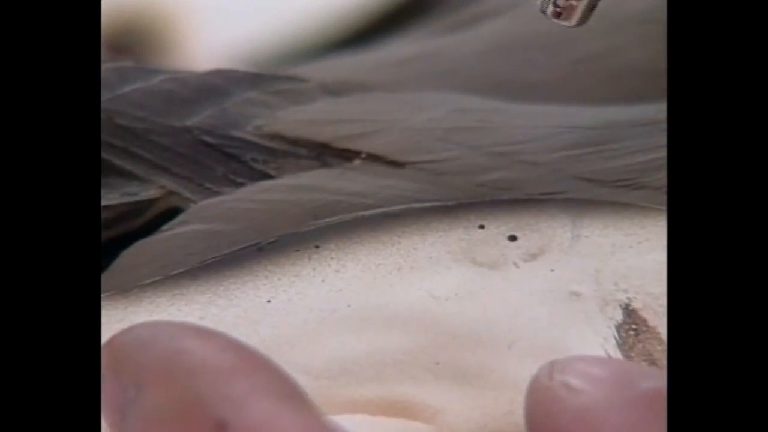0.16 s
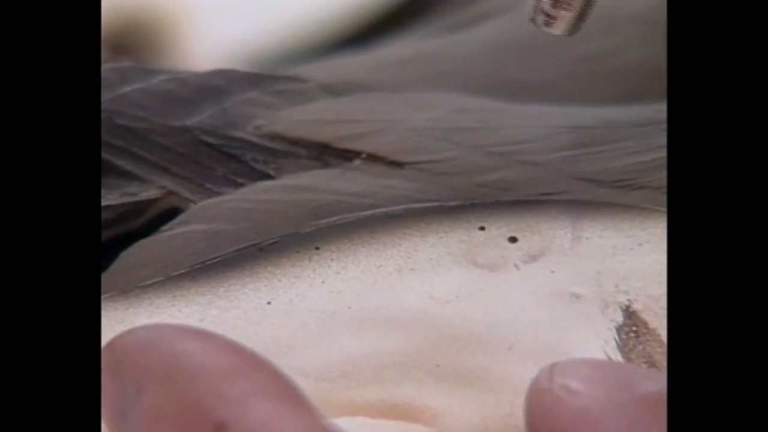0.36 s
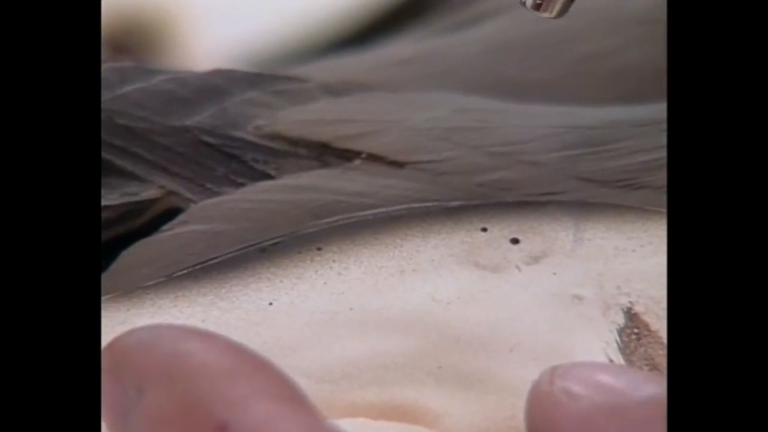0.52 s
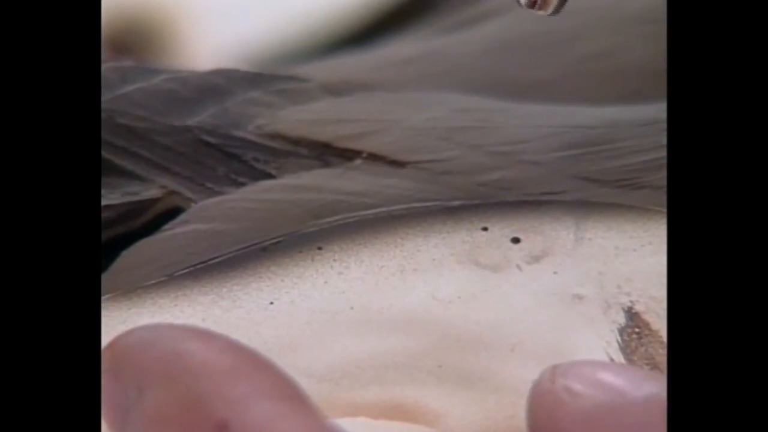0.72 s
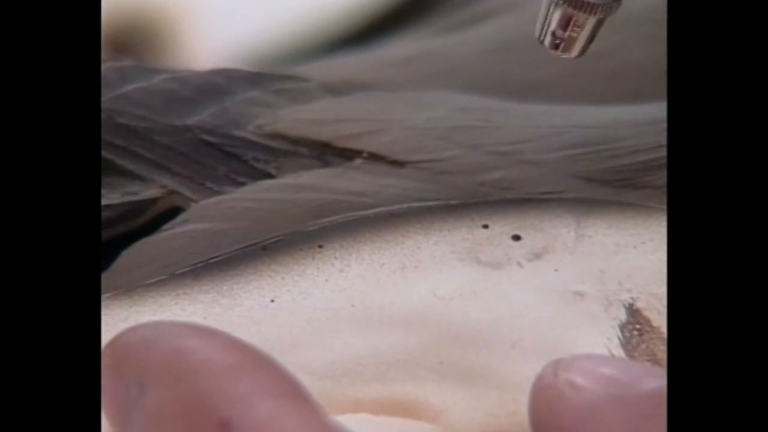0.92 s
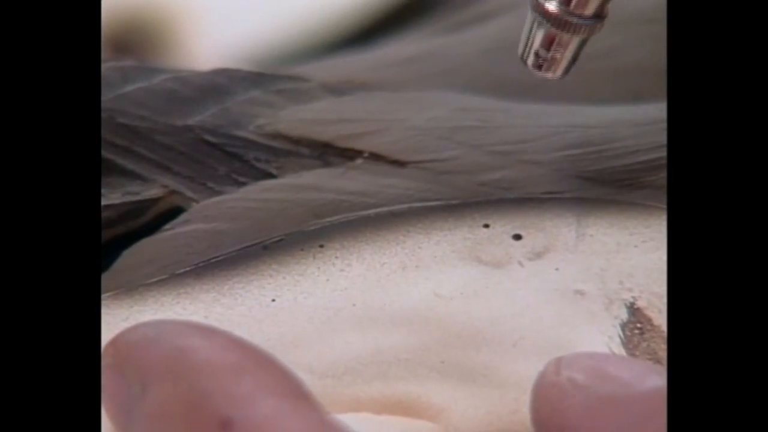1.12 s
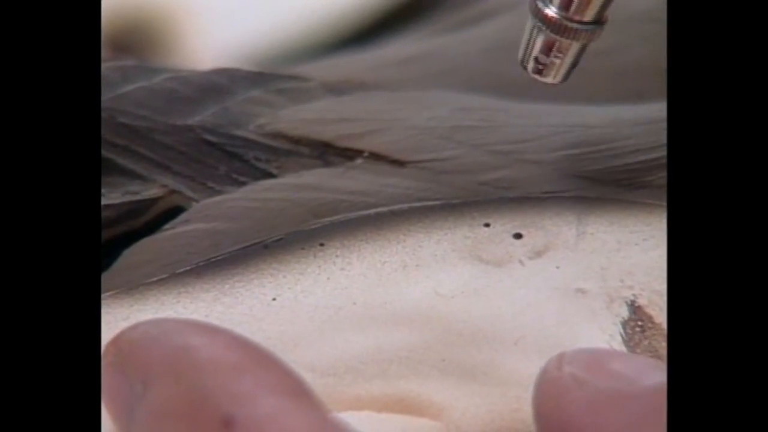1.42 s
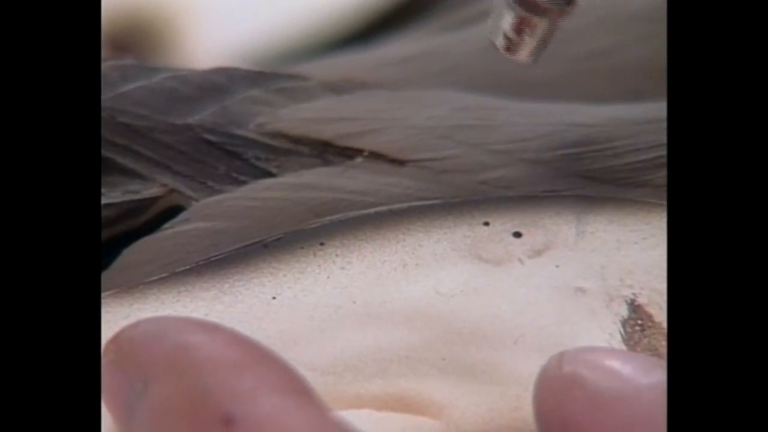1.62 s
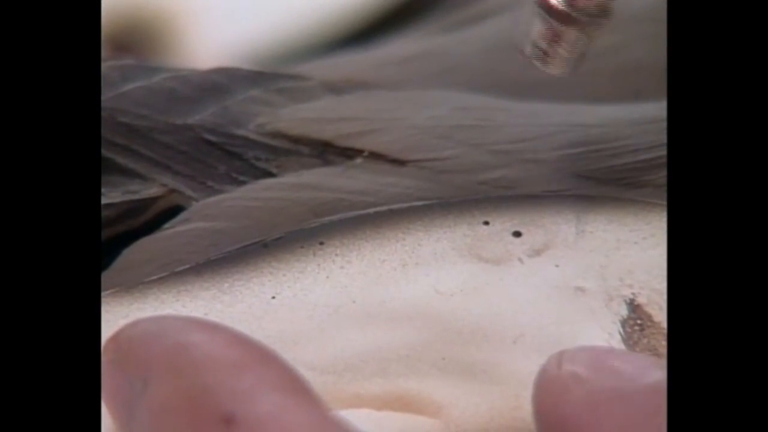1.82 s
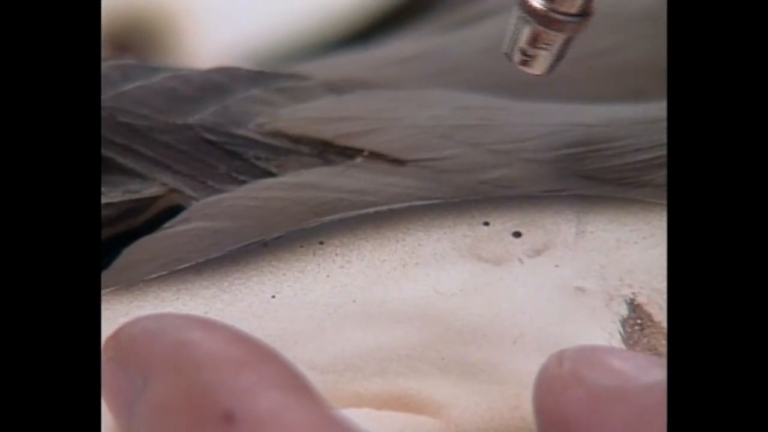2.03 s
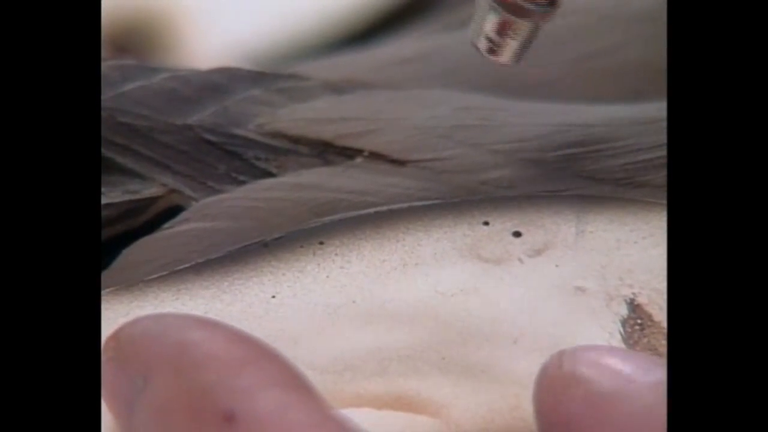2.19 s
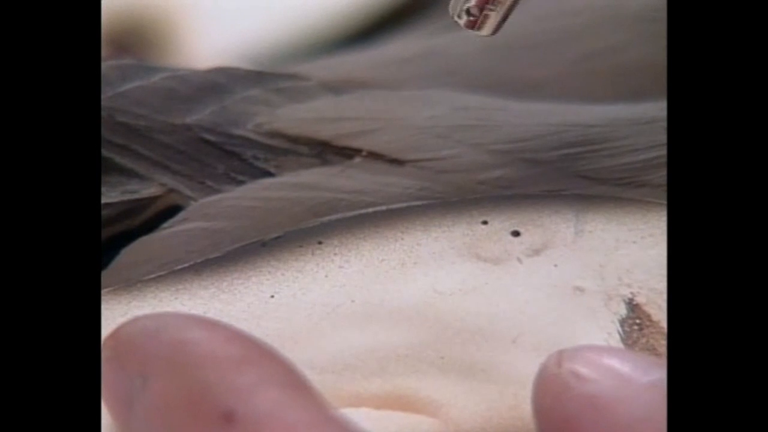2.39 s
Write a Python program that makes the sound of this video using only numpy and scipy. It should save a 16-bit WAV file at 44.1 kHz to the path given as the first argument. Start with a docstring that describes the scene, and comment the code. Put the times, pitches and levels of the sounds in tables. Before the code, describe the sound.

An airbrush sprays three short, bright hissing bursts, the last one easing off.

```python
"""Airbrush in a small workshop

Three close bursts of spray, the last eased off. Each time the trigger goes down, air leaks first;
then the valve opens on a bright nozzle hiss over the lower rush of the jet on the work.
The room rings briefly, and a machine hum and a faint electrical whine sit underneath.
The scene ends on the leak of a fourth press."""
import sys
import numpy as np
from scipy import signal
from scipy.fft import rfft, irfft, next_fast_len
from scipy.io import wavfile
from scipy.ndimage import map_coordinates

SR = 44100
rng = np.random.default_rng(int(sys.argv[2]) if len(sys.argv) > 2 else 0)


def put_to_file(sound):
    """Save the sound as 16-bit audio at rate SR, in the file named by the first command-line argument."""
    columns = np.atleast_2d(sound).T  # one column per channel
    safe = np.clip(columns, -1, 1)
    whole_steps = np.round(safe * 32767)
    wavfile.write(sys.argv[1], SR, whole_steps.astype(np.int16))


N = 112454

# stereo image of the air, wider in the treble (frequency [Hz], coherence [0-1])
AIR_COHERENCE = [(2000, .9998), (3300, .997), (4300, .96), (7000, .78), (15000, .69)]
# stereo image of the room tone, almost mono (frequency [Hz], coherence [0-1])
ROOM_TONE_COHERENCE = [(30, .97), (100, .93), (700, .96), (3000, .99)]
# phase of left against right (frequency [Hz], lead [rad])
LEFT_LEAD = [(5000, 0), (8500, -.3), (13000, -.65), (15500, -.3)]
# lean to the left (frequency [Hz], left minus right [dB])
BALANCE = [(4000, 0), (8100, 1.6), (13000, 2.2)]
# partials of the machine hum (frequency [Hz], level [dB])
HUM_PARTIALS = [(59.2, -66), (102.3, -68.5), (119, -74), (170, -77.5), (188.4, -73.5), (236.9, -73.5),
                (468.3, -84)]
# colour of the room tone (frequency [Hz], gain [dB])
ROOM_TONE_EQ = [(22, -6.5), (45, -1), (62, 1.5), (80, -6.5), (170, -4.5), (300, -20.5), (520, -22.5),
                (800, -32), (1900, -32), (3000, -38.5), (15000, -36.5)]
# trigger presses (valve opens [s], valve shuts [s], leak lead time [s], peak leak level [dB])
PRESSES = [(0.217, 0.623, .036, -45.5), (0.842, 1.215, 0.061, -47.5), (1.663, 2.356, 0.044, -51),
           (2.565, 2.698, 0.052, -44)]
# colour of the leak (frequency [Hz], gain [dB])
LEAK_EQ = [(300, -13), (750, -17.5), (1200, 8.5), (2600, 1), (7000, 3), (11000, 4.5), (15500, 4)]
# nozzle hiss envelopes, one a burst (time [s], level [dB])
HISS_ENVELOPES = [
    [(0.225, -30.5), (0.347, -30), (0.593, -36.5), (0.615, -40.5)],
    [(0.845, -33), (0.847, -36), (1.185, -35.5), (1.21, -40)],
    [(1.67, -35.5), (1.788, -32.5), (1.884, -36), (2.132, -38), (2.144, -41), (2.228, -40.5),
     (2.355, -59.5)],
]
# broad colour of the hiss (frequency [Hz], gain [dB])
HISS_EQ = [(1000, -68), (1400, -35.5), (4800, -19.5), (6700, -14), (8300, -9), (9200, -3), (10500, -2),
           (10950, -8), (12500, -2), (13000, -13), (14200, -4.5), (14700, -16.5), (15700, -11.5)]
# resonances of the hiss (centre [Hz], width [Hz], boost [dB])
HISS_PEAKS = [(5676, 300, 11.5), (7680, 730, 6), (8690, 190, 5.5), (9940, 450, 4.5), (12000, 394, 5)]
# colour of a wide-open nozzle's sizzle (frequency [Hz], gain [dB])
SIZZLE_EQ = [(6000, -64), (7500, 8.5), (8300, -25.5), (11000, -17), (11800, 7.5), (12500, 8.5), (13100, -9),
             (14200, 14), (14700, 0.5), (15700, -11)]
# jet rush envelopes, one a burst (time [s], level [dB])
RUSH_ENVELOPES = [
    [(0.225, -51.5), (0.229, -50), (0.483, -41.5), (0.615, -43)],
    [(0.845, -47.5), (0.869, -42.5), (1.201, -43.5), (1.21, -42)],
    [(1.67, -49), (1.7, -46.5), (1.728, -50), (1.836, -42.5), (2.146, -43.5), (2.355, -55)],
]
# broad colour of the rush (frequency [Hz], gain [dB])
RUSH_EQ = [(600, -64), (930, -20), (1130, 1), (1350, 2), (2100, -0.5), (3100, -6), (5000, -8), (6600, 0),
           (9000, -27), (15000, -14)]
# resonances of the rush (centre [Hz], width [Hz], boost [dB])
RUSH_PEAKS = [(1566, 360, 6.5), (2557, 240, 9), (3670, 460, 11.5), (4395, 560, 10.5), (5660, 750, 7)]
# colour of the jet's send into the workshop (frequency [Hz], gain [dB])
SEND_EQ = [(400, -9.5), (850, -12.5), (1300, 1.5), (2000, 2), (2900, -0.5), (4000, 5), (6500, 0.5),
           (9000, 1.5), (12000, -3.5), (15000, -6)]
# reverb time of the workshop (frequency [Hz], time to fall 60 dB [s])
REVERB_T60 = [(300, 0.61), (2000, 0.38), (6000, 0.31), (14000, .33)]
# envelopes of a faint low-mid noise band that drops out in patches, one a burst (time [s], level [dB])
LOW_MID_ENVELOPES = [
    [(.33, -106.5), (.39, -50.5), (.48, -58), (.60, -49)],
    [(.85, -44), (1.06, -48), (1.17, -86)],
    [(1.78, -67.5), (1.96, -47.5), (2.11, -95), (2.22, -52.5), (2.35, -51.5)],
]
# colour of that band (frequency [Hz], gain [dB])
LOW_MID_EQ = [(200, -27.5), (340, -5.5), (560, 3.5), (780, -16.5), (950, -11.5), (1300, -3.5)]


def amp(db):
    """Decibels to linear gain."""
    return 10 ** (np.asarray(db) / 20)


def curve_at(points, hz):
    """Read a curve on a log frequency axis."""
    freqs, values = np.transpose(points)
    return np.interp(np.log(hz + 1), np.log(freqs + 1), values)


def wobble(rate):
    """A smooth random modulator with `rate` knots a second."""
    knots = rng.standard_normal(int(N * rate / SR) + 4)
    return map_coordinates(knots, [np.arange(N) * rate / SR])


def filtered(x, response):
    """Shape x with a frequency response."""
    size = next_fast_len(N + SR // 2)
    return irfft(rfft(x, size) * response(np.fft.rfftfreq(size, 1 / SR)), size)[..., :N]


def air_noise(eq, peaks=(), coherence=AIR_COHERENCE):
    """Stereo turbulence at unit rms, with a broad colour and resonances."""
    def colour_and_width(hz):
        boost_db = sum(db / (1 + (2 * (hz - centre) / width) ** 2) for centre, width, db in peaks)
        spread = np.arccos(np.clip(curve_at(coherence, hz), -1, 1)) / 2
        return amp(curve_at(eq, hz) + boost_db) * [np.cos(spread), np.sin(spread)]

    def pan(hz):
        half = np.array([[.5], [-.5]])
        return amp(half * curve_at(BALANCE, hz)) * np.exp(1j * half * curve_at(LEFT_LEAD, hz))

    mid, side = filtered(rng.standard_normal((2, N)), colour_and_width)
    stereo = filtered(np.array([mid + side, mid - side]), pan)
    return stereo / np.sqrt(np.mean(stereo ** 2) + 1e-20)


def room_bed(whine_hz=15734, whine_db=-81.5, room_tone_db=-66, waver_db=1.0, drift_rad=.34):
    """A slightly unsteady machine hum and a thin electrical whine over low room tone."""
    t = np.arange(N) / SR

    def tone(hz, db):
        peak = np.sqrt(2) * amp(db + waver_db * wobble(13))
        return peak * np.sin(2 * np.pi * (hz * t + rng.random()) + drift_rad * wobble(7.9))

    hum = sum(tone(hz, db) for hz, db in HUM_PARTIALS)
    whine = tone(whine_hz, whine_db)
    return hum + whine + amp(room_tone_db) * air_noise(ROOM_TONE_EQ, coherence=ROOM_TONE_COHERENCE)


def trigger_leak(swell_db_per_s=330, attack_s=.018):
    """Air escapes as the trigger goes down: a thin hiss that swells until the valve opens."""
    t, envelope = np.arange(N) / SR, np.zeros(N)
    for opens, _, lead_s, peak_db in PRESSES:
        gate = np.clip((t - opens + lead_s) / attack_s + .5, 0, 1) * (t < opens)
        envelope += gate * amp(peak_db + swell_db_per_s * np.minimum(t - opens, 0))
    return envelope * air_noise(LEAK_EQ)


def valve_flow(envelopes, open_s=.006, shut_s=.012):
    """The valve's travel gates each burst's envelope in and out."""
    t, flow = np.arange(N) / SR, np.zeros(N)
    for (opens, shuts, *_), points in zip(PRESSES, envelopes):
        gate = np.clip((t - opens) / open_s + .5, 0, 1) * np.clip((shuts - t) / shut_s + .5, 0, 1)
        flow += gate * amp(np.interp(t, *np.transpose(points)))
    return flow


def nozzle_hiss(trim_db=-.2, full_flow_db=-26, full_sizzle_db=-39.5, sizzle_db_per_db=4.7):
    """Air hisses through the nozzle; a thin sizzle climbs steeply as it nears full flow."""
    flow = valve_flow(HISS_ENVELOPES)
    hiss = amp(trim_db) * flow * air_noise(HISS_EQ, HISS_PEAKS)
    sizzle_gain = amp(full_sizzle_db) * (flow / amp(full_flow_db)) ** sizzle_db_per_db
    return hiss + sizzle_gain * air_noise(SIZZLE_EQ)


def jet_rush(trim_db=.48, puff_db=8.5, puff_decay_s=.0026):
    """The jet rushes on the work, with a puff of stored air on each attack."""
    t = np.arange(N) / SR
    accent_db = sum(puff_db * np.exp(-np.abs(t - opens) / puff_decay_s) for opens, *_ in PRESSES)
    return amp(trim_db + accent_db) * valve_flow(RUSH_ENVELOPES) * air_noise(RUSH_EQ, RUSH_PEAKS)


def workshop_reverb(send_db=-8):
    """The jet's wide, even sound fills the room and dies in a short diffuse tail, the treble first."""
    hz, t, spectrum = signal.stft(rng.standard_normal(SR // 2), SR, nperseg=256)
    decay = amp(-60 * t / curve_at(REVERB_T60, hz)[:, None])
    tail = signal.istft(spectrum * decay, SR, nperseg=256)[1]
    send = amp(send_db) * valve_flow(RUSH_ENVELOPES) * air_noise(SEND_EQ)
    return signal.fftconvolve(send, tail[None] / np.linalg.norm(tail), axes=1)[:, :N]


def low_mid_band():
    """A faint low-mid band of noise under the spray that drops out in patches."""
    return valve_flow(LOW_MID_ENVELOPES) * air_noise(LOW_MID_EQ)


def spray(flutter_db=.4, sputter_db=.5):
    """The layers of the spray flutter together as the paint feeds."""
    layers = nozzle_hiss() + jet_rush() + low_mid_band()
    return layers * amp(flutter_db * wobble(45.56) + sputter_db * wobble(400))


def scene():
    """The airbrush up front, with its reverb and the room bed behind."""
    return spray() + trigger_leak() + workshop_reverb() + room_bed()


def record(dry):
    """A brick-wall high cut takes off the very top."""
    cutoff_hz = 15870
    return filtered(dry, lambda hz: hz < cutoff_hz)


dry = scene()
out = record(dry)
put_to_file(out)
```